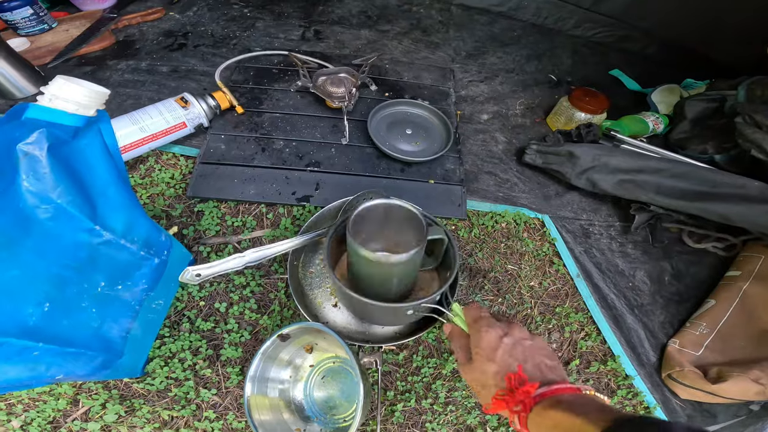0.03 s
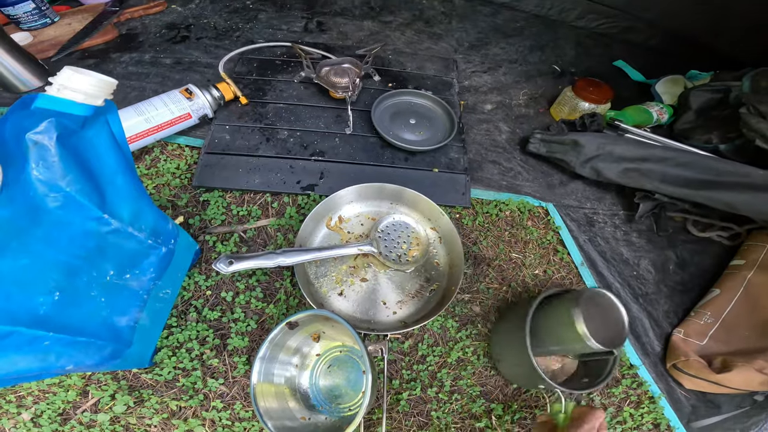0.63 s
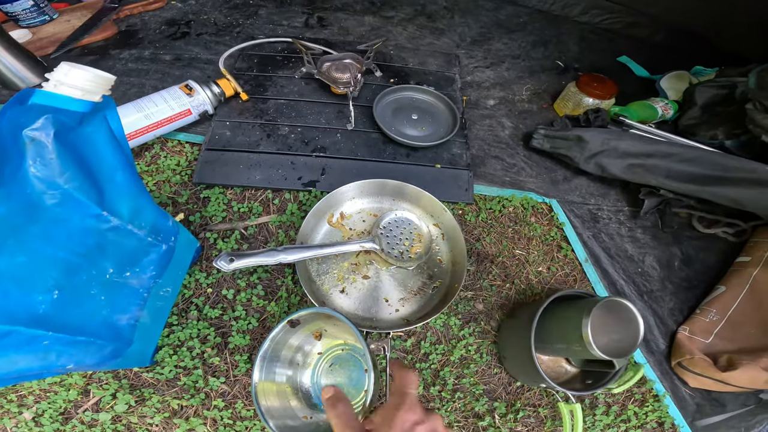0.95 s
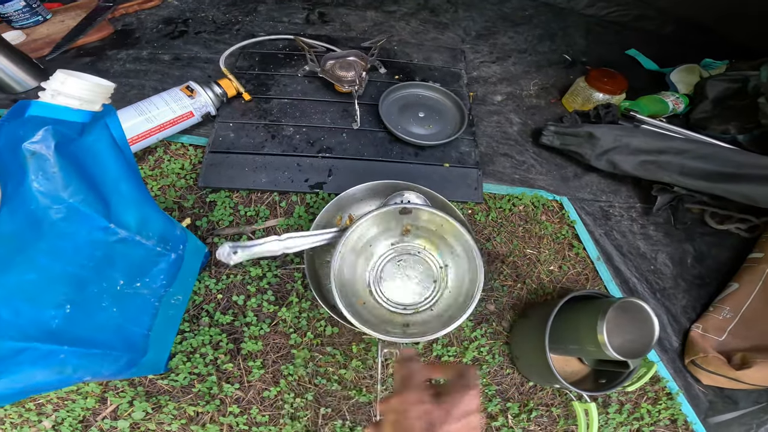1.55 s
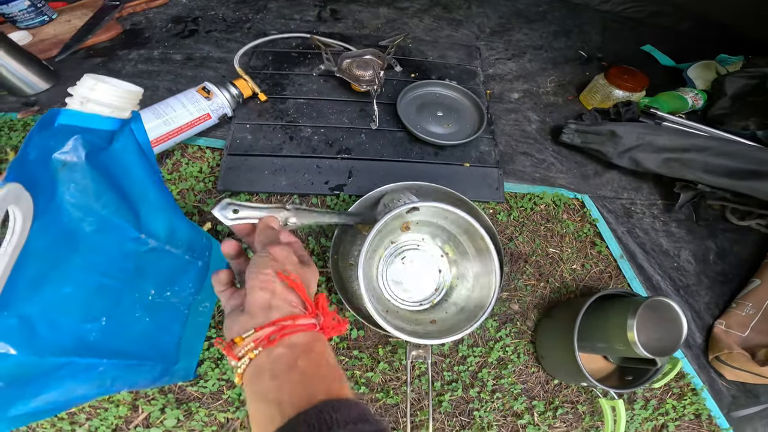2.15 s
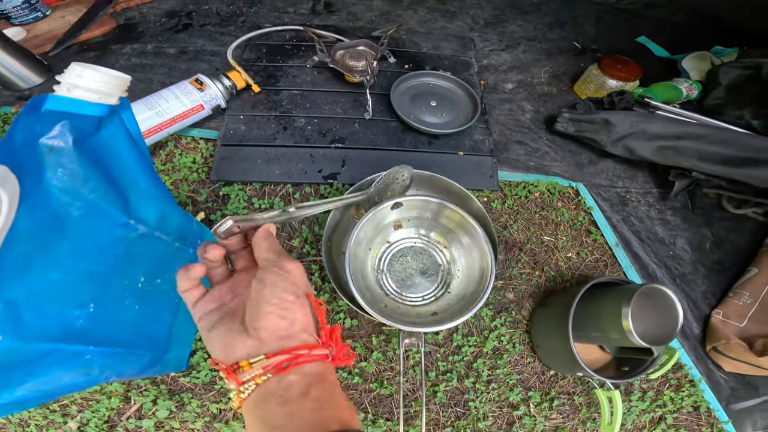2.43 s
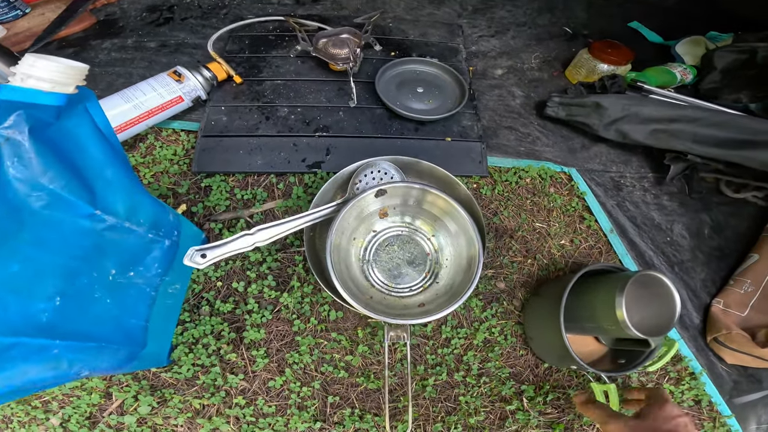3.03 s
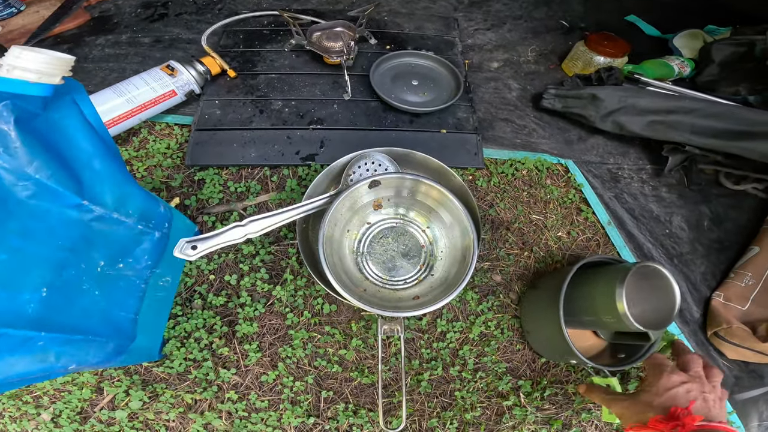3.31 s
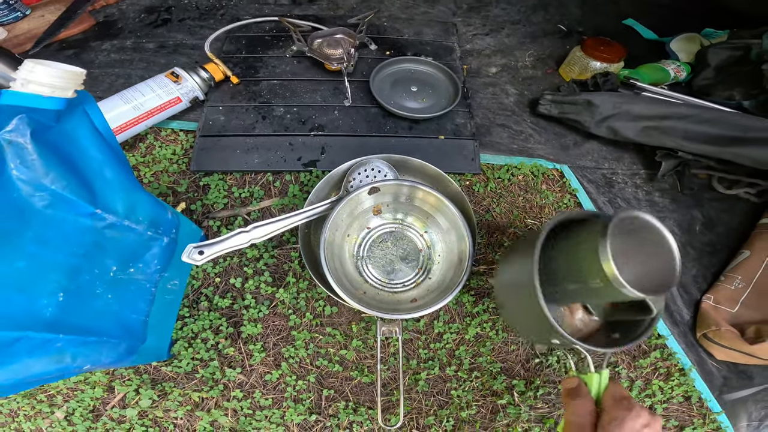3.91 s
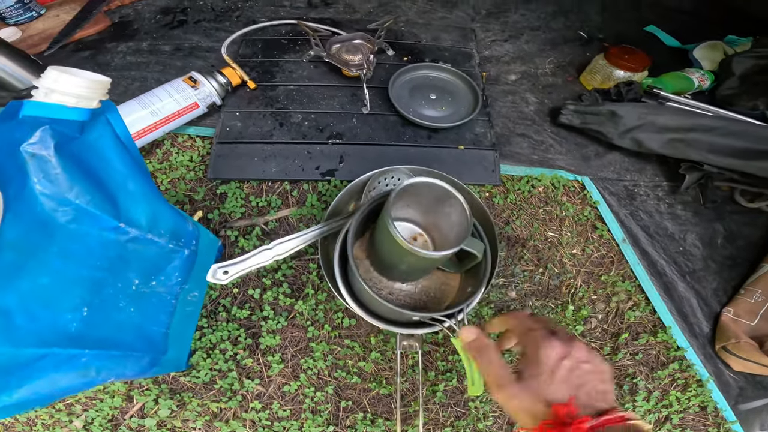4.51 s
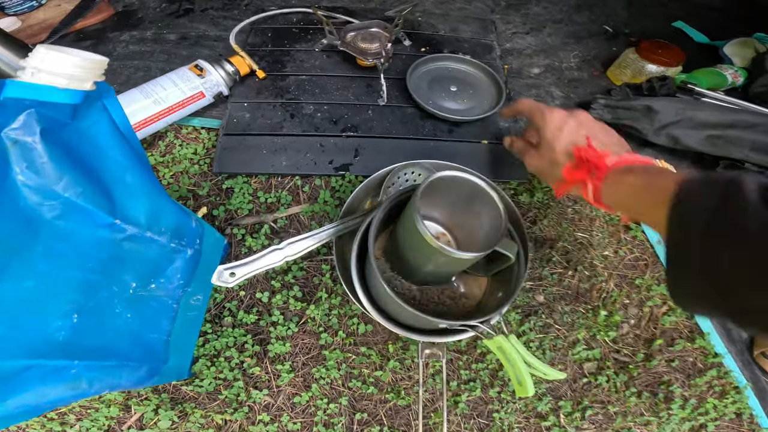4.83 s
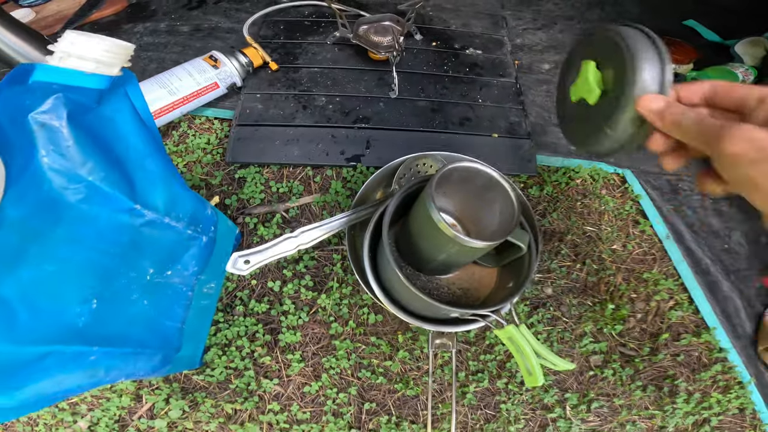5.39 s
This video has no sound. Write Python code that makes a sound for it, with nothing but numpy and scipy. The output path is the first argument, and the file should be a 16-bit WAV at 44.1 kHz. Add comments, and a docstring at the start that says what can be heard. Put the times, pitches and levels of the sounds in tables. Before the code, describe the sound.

Close metal cookware clatters, grinds and squeaks while being nested together outdoors, with one loud ringing clang from a bowl.

```python
"""In a quiet open shelter, steel camping cookware is stacked on the grass close by.
A pot with a mug in it scrapes off a pan and is set down; a bowl is picked up ringing, dropped in the
pan and slid home. A strainer is dragged round the pan, the pot is dropped into the bowl, and a lid is
picked off a table. Impacts excite the modes of the steel, which clatter and ring as they decay;
stick-slip friction makes it grind, squeak and sing. Soft outdoor air lies underneath."""
import sys
import numpy as np
from scipy import signal
from scipy.fft import rfft, irfft
from scipy.io import wavfile
from scipy.ndimage import uniform_filter1d

SR = 44100
rng = np.random.default_rng(int(sys.argv[2]) if len(sys.argv) > 2 else 0)


def dump_mix(stems):
    """Bounce the given channels to the path in sys.argv[1] as a 16-bit WAV at rate SR."""
    frames = np.atleast_2d(stems).T  # one column per channel
    limited = np.clip(frames, -1, 1)  # hard clip at full scale
    pcm = np.round(limited * 32767).astype(np.int16)
    wavfile.write(sys.argv[1], SR, pcm)


N = 249606
TIME = np.arange(N) / SR


def gain_of(db):
    """Decibels to amplitude."""
    return 10 ** (np.asarray(db) / 20)


def unit_rms(x):
    """Scales a signal to an rms of one."""
    return x / np.sqrt(np.mean(x ** 2) + 1e-20)


def spectrum_at(points, hz):
    """Amplitude of a (Hz, dB) spectrum, interpolated over log frequency."""
    point_hz, db = np.transpose(points)
    return gain_of(np.interp(np.log(hz + 1), np.log(point_hz + 1), db))


def add(mix, start_s, sound):
    """Superposition: sums a sound into the mix."""
    part = mix[max(round(start_s * SR), 0):][:len(sound)]
    part += sound[:len(part)]


def band(x, lo_hz, hi_hz, order=3):
    """Causal Butterworth band-pass."""
    return signal.sosfilt(signal.butter(order, [lo_hz, hi_hz], "band", fs=SR, output="sos"), x)


def held(start, stop, attack_s, t60):
    """Envelope of a driven vibration: a linear rise, a hold, then free decay."""
    return np.clip((TIME - start) / attack_s, 0, 1) * gain_of(-60 * np.maximum(TIME - stop, 0) / t60)


def background(air_db=-49.5, air_width=0.28, buffet_width=0.42):
    """Partly coherent noise at two microphone ports: outdoor air, and low buffets as an arm moves."""
    # Spectrum of the air. Each row: frequency in Hz, level in dB.
    air_colour = [(12, -22), (20, -1.5), (49, -12), (87, -6), (124, -11), (199, -11.5), (286, -15),
                  (398, -17), (865, -25), (1640, -22), (2550, -30), (8200, -40), (10500, -56.5),
                  (15000, -66)]
    # The level of the background, which dips briefly from 1.45 s. Each row: time in seconds, gain in dB.
    air_swell = [(0, 2), (1.45, 1), (1.75, -6), (2.5, -2), (4.2, 1), (5.66, 2)]
    # Buffets. Each row: time of the peak in seconds, level in dB, rise and fall constant in seconds.
    buffets = [(4.448, -31.5, 0.031), (4.92, -41, 0.022), (5.191, -26.5, 0.019), (5.37, -35, 0.36)]
    hz = np.fft.rfftfreq(N, 1 / SR)
    noise = irfft(rfft(rng.standard_normal((2, N))) * spectrum_at(air_colour, hz), N)
    mid, side = (unit_rms(x) for x in noise)
    swell = gain_of(air_db + np.interp(TIME, *np.transpose(air_swell)))
    air = swell * np.array([mid + air_width * side, mid - air_width * side])
    mid, side = unit_rms(band(rng.standard_normal((2, N)), lo_hz=10, hi_hz=42, order=2))
    pressure = sum(gain_of(db) * np.exp(-abs(TIME - s) / fade_s) for s, db, fade_s in buffets)
    return air + pressure * np.array([mid + buffet_width * side, mid - buffet_width * side])


def slide(strokes, colour, slips_per_s, uneven_db, patchy_db, pan_db, t60, release_t60, attack_s=0.015):
    """Stick-slip friction: random slips ring the steel, the moving contact favouring changing modes."""
    # Resonances of the rubbed pan. Each row: frequency in Hz, width in Hz, lift in dB.
    pan_modes = [(478, 36, 8), (873, 11, 6.5), (1377, 75, 9.5), (1195, 15, 16), (1786, 81, 5.5),
                 (2930, 69, 10.5), (3000, 31, -26), (3380, 35, 7), (4160, 68, 3.5), (5970, 36, -21),
                 (7400, 22, 15), (7680, 14.6, 15.5), (7750, 10, 19), (8280, 8, 13), (8220, 7, 14)]
    slips = rng.random(N) < slips_per_s / SR
    slips = slips * gain_of(uneven_db * np.minimum(rng.exponential(1, N), 3)) * rng.choice([-1, 1], N)
    t, hz = np.arange(SR // 6) / SR, np.fft.rfftfreq(N, 1 / SR)
    steel = signal.oaconvolve(slips, rng.standard_normal(len(t)) * gain_of(-60 * t / t60))[:N]
    pan_power = 1 + sum(gain_of(db + pan_db) ** 2 / (1 + (2 * (hz - mode_hz) / width) ** 2)
                        for mode_hz, width, db in pan_modes)
    steel = irfft(rfft(steel) * spectrum_at(colour, hz) * np.sqrt(pan_power), N)
    frames = signal.stft(steel, nperseg=512)[2]
    patches = uniform_filter1d(rng.standard_normal(frames.shape), size=5, axis=0)  # over frequency
    patches = unit_rms(uniform_filter1d(patches, size=8, axis=1))  # over time
    rub = signal.istft(frames * gain_of(patchy_db * patches), nperseg=512)[1][:N]
    grind, screech = band(rub, 150, 6300, order=6), band(rub, 6700, 17000, order=6)
    forces = np.max([np.outer(gain_of(levels_db), held(start, stop, attack_s, release_t60))
                     for start, stop, *levels_db in strokes], axis=0)
    # Each band is divided by its running rms, so the hand's force sets its level.
    return sum(force * part / np.sqrt(uniform_filter1d(part ** 2, size=2200) + 1e-12)
               for force, part in zip(forces, (grind, screech)))


def rebounds(blows, middle_db, gap_s, loss_db, duller_db, graze_db, graze_s=0.005):
    """Inelastic impact: a graze, a strike and a softer return; hard contacts trade bass for treble."""
    touches = [(0, 0, 0), (-graze_s, graze_db, 0), (gap_s, -loss_db, -duller_db)]
    contacts = [(s + delay, db + change, hardness + harder, t60)
                for delay, change, harder in touches for s, db, hardness, t60, *_ in blows]
    return [(s, db - hardness, db + middle_db, db + hardness, t60) for s, db, hardness, t60 in contacts]


def clatter(contacts, colour, spacing_hz, crack, crack_t60, rise_s, size=16384):
    """Impulse response of dense, heavily damped modes: a hard crack, then a quick metallic decay."""
    # The low, middle and treble ranges of a blow. Each row: lower edge in Hz, upper edge in Hz.
    ranges = [(60, 2200), (2200, 6500), (6500, 17000)]
    hz, t, out = np.fft.rfftfreq(size, 1 / SR), np.arange(size) / SR, np.zeros(N)
    for s, *levels_db, t60 in contacts:
        modes = (rng.random(len(hz)) < hz[1] / spacing_hz) + 0.056  # each contact wakes another set
        spectrum = modes * spectrum_at(colour, hz) * np.exp(2j * np.pi * rng.random(len(hz)))
        decay = gain_of(-60 * t / t60) + crack * gain_of(-60 * t / crack_t60)
        envelope = decay * (1 - np.exp(-t / rise_s))
        for db, (lo, hi) in zip(levels_db, ranges):
            part = irfft(spectrum * (hz >= lo) * (hz < hi)) * envelope
            add(out, s, gain_of(db) * part / part[:SR // 150].std())  # level set by the first 7 ms
    return out


def ring(blows, modes, spread_db, rise_s=0.0037):
    """Free vibration: distinct modes decay exponentially, in a balance that varies from blow to blow."""
    hz, t60, *spot_levels = np.transpose(modes)
    t, out = np.arange(SR) / SR, np.zeros(N)
    waves = gain_of(-60 * t / t60[:, None]) * np.exp(2j * np.pi * hz[:, None] * t)
    waves *= (1 - np.exp(-t / rise_s)) * np.minimum(1, 10 * (1 - t))
    for s, _, _, _, ring_db, *spot in blows:
        mode_db = np.array([np.interp(sum(spot), np.arange(len(row)), row)
                            for row in np.transpose(spot_levels)])
        amplitudes = gain_of(ring_db + mode_db + spread_db * rng.standard_normal(len(hz)))
        phases = np.exp(2j * np.pi * rng.random(len(hz)))
        add(out, s, ((amplitudes * phases) @ waves).real)
    return out


def pot():
    """Impact and friction excite the pot; the point struck decides how strongly each mode responds."""
    # Blows. Each row: start in seconds, strength in dB, hardness in dB, clatter t60 in seconds,
    # ring in dB, spot struck (0 the mug inside, 1 the handle, 2 the base).
    blows = [(.018, -39.5, -1.5, 0.076, -37.5, .9), (.067, -27.5, -1.5, 0.095, -25.5, 1.4),
             (.271, -32, -7, 0.039, -36, .45), (.306, -39, 8.5, .047, -41.5, 1),
             (.321, -38, -4, 0.088, -41, 0), (.426, -50, -9, .057, -46, .2),
             (.608, -31.5, -4.5, 0.17, -27, 0), (.673, -38, -7, 0.09, -39, 0),
             (.772, -43.5, -3.5, 0.31, -45, 1), (.7965, -25, -1, 0.12, -33, 1),
             (.980, -53, -15, 0.2, -58, 0), (1.015, -49, -1, .05, -63, 1), (1.028, -46, -6, 0.074, -44, .4),
             (3.439, -39.5, -2.5, 0.067, -46, 1), (3.535, -31.5, -3, 0.18, -34.5, 1),
             (3.545, -25, 1.5, 0.1, -39, 0.34), (3.654, -54.5, -8.5, .15, -52, .4),
             (3.690, -43, 1.5, 0.11, -48, 1), (3.7095, -31, -4, 0.11, -41, .1),
             (3.893, -55, -14, 0.067, -63, .7), (4.458, -30.5, -3.5, .1, -46, 1),
             (4.4885, -32.5, -14, 0.025, -32, 1.84), (4.539, -37, 4, 0.093, -32, 2),
             (4.606, -31, -0.5, 0.1, -33.5, 1.86), (4.703, -45.5, -3, 0.028, -55, 1)]
    # Modes. Each row: frequency in Hz, t60 in seconds, level in dB when struck at mug, handle and base.
    modes = [(602, 0.3, -5, -14, -13.5), (850, .2, -10, -9, -6), (1215, 0.51, -19, -13.5, -12),
             (1310, 0.32, -29, -3, -13), (1430, .13, 5.5, 7, -7), (1487, 0.21, 4.5, 1, -14),
             (1780, 0.16, -23, -3, -12), (1764, 0.4, -25, -6, -10), (2470, 0.32, -13, -14, -30),
             (2792, 0.43, -19, -38, 2), (2850, 0.53, -24, -20, -11), (3040, 0.43, -40, -1.5, -16),
             (3080, 0.45, -16, -15, -28), (3246, 0.033, 20, -22, -24), (3500, 0.089, -18, 0, -19),
             (3600, 0.053, 9, -14, -21), (3820, 0.19, -23, -3, -10), (3820, 0.29, -23, -22, -32),
             (4110, 0.54, -21, -14, -40), (4560, 0.51, -27, -16, -40), (4950, 0.13, -16, -4, -32),
             (5600, .09, -16, 1, -20), (6800, .15, -28, -16, -36), (7460, .17, -14, -17, -24),
             (8600, .12, -25, -12, -25)]
    # Spectra of the clatter and of the rubbing. Each row: frequency in Hz, level in dB.
    colour = [(120, -11), (480, -14.5), (590, -8), (760, -12), (920, 3.5), (1170, -6.5), (1470, -1.5),
              (2100, -8.5), (3230, -1.5), (4350, -9), (5600, -1), (8400, -10.5), (10000, -25), (15500, -38)]
    rub_colour = [(180, -18), (300, -14), (365, -16), (459, -20.5), (703, -20), (855, 4), (1020, -10),
                  (1210, -14), (1790, -7.5), (2440, -13.5), (3670, -10), (6100, -5), (7540, -20.5),
                  (15000, -46.5)]
    # Strokes off the pan, then into the bowl.
    # Each row: start and stop in seconds, grind in dB, screech in dB.
    scraping = [(0, 0.203, -39, -42.5), (0.181, 0.256, -33, -34), (0.254, 0.317, -30, -30.5),
                (0.356, 0.596, -35, -36)]
    settling = [(4.457, 4.492, -28, -33), (4.535, 4.57, -32, -32.5), (4.59, 4.625, -45, -41.5)]
    contacts = rebounds(blows, middle_db=2, gap_s=0.014, loss_db=12, duller_db=6, graze_db=-16.5)
    out = clatter(contacts, colour, spacing_hz=49.9, crack=1, crack_t60=0.051, rise_s=0.0001)
    out += ring(blows, modes, spread_db=3)
    out += slide(scraping, rub_colour, slips_per_s=1600, uneven_db=3.5, patchy_db=4.5, pan_db=-3.5,
                 t60=0.043, release_t60=0.16)
    return out + slide(settling, rub_colour, slips_per_s=1100, uneven_db=2.5, patchy_db=5, pan_db=0.5,
                       t60=0.032, release_t60=0.12)


def squeaks(waver=0.013):
    """Mode lock-in: a sliding edge drives a single mode into a brief, wavering tone."""
    # Squeaks and groans. Each row: centre in seconds, pitch in Hz, peak in dB, half width in seconds.
    tones = [(0.26, 7750, -20.5, .0058), (1.495, 463, -28, 0.04), (0.348, 4300, -32, 0.0086),
             (.387, 3840, -30, 0.0096), (2.68, 860, -28, 0.023), (2.997, 4000, -27.5, 0.014),
             (4.59, 5560, -26, .0037), (4.624, 4900, -30, 0.0045), (2.623, 5220, -29, 0.0089)]
    t, out = np.arange(SR // 5) / SR, np.zeros(N)
    for s, hz, db, half_s in tones:
        pitch = hz * (1 + waver * unit_rms(uniform_filter1d(rng.standard_normal(len(t)), size=150)))
        swell = np.exp(-((t - t.mean()) / half_s) ** 2)
        add(out, s - t.mean(), gain_of(db) * swell * np.sin(2 * np.pi * np.cumsum(pitch) / SR))
    return out


def clunks(thud_t60=0.085, bounce_s=0.011):
    """Plate flexure: a thin bottom lands, bends for a few cycles, bounces and thuds on soft ground; one low row
    is a push as an arm swings."""
    # Landings, and at 4.443 s a low push as an arm swings. Each row: start in seconds, frequency in Hz, peak in
    # dB, swell in seconds, thud in dB, loss per bounce in dB.
    landings = [(.799, 928, -20, 0.0046, -50, 3.5), (1.4544, 1003, -1, 0.001, -24.5, 10),
                (1.5051, 940, -8, 0.0028, -28, 4.5), (1.642, 1030, -12.5, 0.0026, -63, 15),
                (1.723, 1074, -8.5, 0.002, -36.5, 11), (4.443, 84.5, -27, 0.011, -35, 20),
                (4.456, 653, -8, 0.0038, -26, 9), (4.4893, 877, -12, 0.003, -25, 24),
                (5.246, 635, -25, 0.0041, -57, 23)]
    t, out = np.arange(SR // 5) / SR, np.zeros(N)
    for s, hz, db, swell_s, thud_db, loss_db in landings:
        flex = (t / swell_s * np.exp(1 - t / swell_s)) ** 2 * np.sin(2 * np.pi * hz * t)
        thud = unit_rms(band(rng.standard_normal(len(t)), lo_hz=90, hi_hz=480, order=2))
        add(out, s, gain_of(thud_db - 60 * t / thud_t60) * thud)
        for bounce in range(3):
            add(out, s + bounce * bounce_s, gain_of(db - bounce * loss_db) * flex)
    return out


def bowl():
    """Lightly damped modes let the struck bowl ring on; friction drives it as it slides into the pan."""
    # Blows. Each row: start in seconds, strength and hardness in dB, clatter t60 in seconds, ring in dB.
    blows = [(1.142, -28, -7.5, 0.18, -24.5), (1.454, -38, 3, 0.065, -28.5), (1.587, -30, 0, .13, -32.5),
             (1.634, -33.5, -2.5, .12, -47), (1.723, -38, -3.5, 0.27, -44), (1.897, -60, -2, .14, -71)]
    # Modes. Each row: frequency in Hz, t60 in seconds, level in dB.
    modes = [(457, .9, -14.5), (729, 3, -21.5), (930, 1.2, -18.5), (1210, 0.52, -9.5), (1353, 0.89, -2.5),
             (1376, 0.36, -1.5), (1743, 0.26, 4), (1810, 0.65, -13), (1954, 0.56, -9), (1987, 0.65, -8.5),
             (2420, 0.34, -8), (2510, 0.53, -19), (3126, 0.18, -9), (3170, 0.25, -9.5), (3200, 0.12, -28),
             (3500, 0.49, -46), (3660, 0.43, -20), (4250, 0.18, -12), (4010, 0.25, -5), (4930, .3, -17),
             (5560, 0.1, -16), (7784, .2, -31)]
    # Spectra of the clatter and of the rubbing. Each row: frequency in Hz, level in dB.
    colour = [(120, -15), (600, -23.5), (950, -7), (1200, 4.5), (1500, -10), (1800, -9.5), (2200, -12.5),
              (3900, -10.5), (4800, -16), (5800, -18.5), (8000, -16), (10000, -25.5), (15500, -45.5)]
    rub_colour = [(150, -35), (420, -20), (560, -43), (740, -4), (900, -2), (1100, -1.5), (1280, -19),
                  (1550, -24), (1800, -10.5), (2200, -24), (2900, -19), (4600, -27.5), (6300, -17),
                  (7800, -21), (10000, -34), (15500, -50)]
    # Strokes. Each row: start and stop in seconds, grind in dB, screech in dB.
    strokes = [(1.473, 1.595, -27, -37), (1.625, 1.673, -25.5, -33), (1.721, 1.765, -32, -35.5)]
    contacts = rebounds(blows, middle_db=2, gap_s=0.014, loss_db=12, duller_db=0, graze_db=-16)
    out = clatter(contacts, colour, spacing_hz=57.3, crack=0.64, crack_t60=0.02, rise_s=0.0001)
    out += bowl_singing() + ring(blows, modes, spread_db=1)
    return out + slide(strokes, rub_colour, slips_per_s=700, uneven_db=7.5, patchy_db=0.5, pan_db=-1,
                       t60=0.21, release_t60=0.15)


def bowl_singing(start_s=1.453, stop_s=1.74, level_db=-21, sag_db_per_s=22.5, waver=0.15):
    """Self-sustained oscillation: an unsteady grip keeps a few modes going, weaker as the bowl slows."""
    # Modes driven by rubbing on the pan. Each row: frequency in Hz, relative level in dB.
    modes = [(463, -21.5), (879, -9), (1179.5, 2), (1377.5, -3.5), (2568, -19), (3129, -15.5), (3246, -33),
             (4188, -24)]
    out = np.zeros(N)
    for hz, db in modes:
        grip = 1 + waver * unit_rms(band(rng.standard_normal(N), lo_hz=3.8, hi_hz=22, order=2))
        out += gain_of(db) * grip * np.sin(2 * np.pi * (hz * TIME + rng.random()))
    sag_db = sag_db_per_s * np.maximum(TIME - start_s, 0)
    return out * gain_of(level_db - sag_db) * held(start_s, stop_s, attack_s=0.018, t60=0.39)


def strainer():
    """Sliding friction and knocks excite the damped modes of a strainer dragged round the pan."""
    # Blows. Each row: start in seconds, strength and hardness in dB, clatter t60 in seconds, ring in dB.
    blows = [(2.196, -40, -2.5, 0.13, -45), (2.259, -34.5, 4, 0.049, -43), (2.458, -40, -7, .08, -43),
             (2.510, -42, 7, 0.31, -40.5), (2.7615, -20, -1, 0.022, -50),
             (2.863, -24.5, -6.5, 0.066, -35.5), (2.890, -33, -4, 0.046, -47),
             (2.922, -38.5, -7, .067, -41), (2.965, -27.5, -1.5, 0.076, -41),
             (2.992, -30.5, 1, .054, -40.5), (3.0445, -28, -0.5, 0.06, -40)]
    # Modes of the strainer on the pan. Each row: frequency in Hz, t60 in seconds, level in dB.
    modes = [(457, 0.4, -34), (817, 0.044, 7), (1193, 0.096, 2), (1786, 0.093, 12.5), (2970, 0.28, -3),
             (3440, 0.17, -4), (3680, 0.21, -1), (4200, 0.15, -12), (6700, 0.13, 4.5), (7700, .13, -9)]
    # Spectra of the clatter and of the rubbing. Each row: frequency in Hz, level in dB.
    colour = [(120, -19), (620, -35), (870, 9), (1400, -5), (1800, 6.5), (2350, -16), (2900, -0.5),
              (5500, -9.5), (6500, -5.5), (7800, 0), (10000, -19), (15500, -44)]
    rub_colour = [(180, -36), (300, -24), (669, -18.5), (855, 1.5), (1620, -19), (1820, -10), (2320, -20.5),
                  (2820, -13.5), (3220, -15.5), (4050, -13), (4390, -14.5), (6400, -9), (7670, -4),
                  (9960, -19.5), (15000, -38.5)]
    # Strokes. Each row: start and stop in seconds, grind in dB, screech in dB.
    strokes = [(2.155, 2.196, -51, -48.5), (2.184, 2.256, -38, -39.5), (2.25, 2.368, -32, -35.5),
               (2.378, 2.556, -39, -40.5), (2.59, 2.61, -38.5, -31), (2.61, 2.635, -31.5, -24.5),
               (2.655, 2.718, -32.5, -38), (2.756, 2.84, -28, -22.5), (2.882, 2.93, -30, -28),
               (2.965, 3.06, -29, -28.5)]
    contacts = rebounds(blows, middle_db=-1, gap_s=0.033, loss_db=15.5, duller_db=5, graze_db=-12)
    out = clatter(contacts, colour, spacing_hz=37.1, crack=0.78, crack_t60=0.019, rise_s=0.00052)
    out += ring(blows, modes, spread_db=0.5)
    return out + slide(strokes, rub_colour, slips_per_s=1500, uneven_db=2.5, patchy_db=3, pan_db=1,
                       t60=0.12, release_t60=0.14)


def lid():
    """Light impacts and a short scrape set the lid in damped vibration as it leaves the table."""
    # Blows. Each row: start in seconds, strength and hardness in dB, clatter t60 in seconds, ring in dB.
    blows = [(5.113, -60, 4.5, .1, -68), (5.145, -55.5, -14.5, 0.13, -66),
             (5.1805, -31, -1.5, 0.073, -40.5), (5.227, -37, -1.5, .07, -36.5),
             (5.2475, -32, -7, .069, -36.5)]
    # Modes. Each row: frequency in Hz, t60 in seconds, level in dB.
    modes = [(640, 0.067, 11.5), (1110, 0.092, 3), (1300, 0.23, -8.5), (1435, 0.55, -15), (2510, .1, 1),
             (2710, 0.2, -8), (3126, 0.1, -3), (4150, 0.091, -12), (5340, 0.11, -4)]
    # Spectrum of both clatter and rubbing. Each row: frequency in Hz, level in dB.
    colour = [(120, -3), (420, -3.5), (630, -1), (850, 0), (1200, -1.5), (2200, -6), (3100, 2), (4500, -10),
              (7200, -6.5), (10000, -25), (15500, -42)]
    # One stroke. Its row: start and stop in seconds, grind in dB, screech in dB.
    strokes = [(5.195, 5.245, -32, -45)]
    contacts = rebounds(blows, middle_db=1, gap_s=0.017, loss_db=16.5, duller_db=3.5, graze_db=-25)
    out = clatter(contacts, colour, spacing_hz=35.1, crack=0.96, crack_t60=0.022, rise_s=0.00059)
    out += ring(blows, modes, spread_db=4)
    return out + slide(strokes, colour, slips_per_s=560, uneven_db=1.5, patchy_db=2, pan_db=-30,
                       t60=0.07, release_t60=0.077)


def shelter(x, scatter_db=-10, echoes_per_s=2500, t60=0.016, treble_tilt_db=1.05):
    """Scattering off nearby gear, a phase difference and a brighter left port set the channels apart."""
    # Phase lead of the left microphone port over the right. Each row: frequency in Hz, lead in radians.
    port_lead = [(250, -0.019), (1000, -0.21), (1720, -1.01), (2760, -0.48), (7000, 0.65), (12000, 1)]
    t, hz = np.arange(SR // 10) / SR, np.fft.rfftfreq(N, 1 / SR)
    echoes = rng.choice([-1, 1], len(t)) * (rng.random(len(t)) < echoes_per_s / SR)
    echoes = echoes * gain_of(-60 * t / t60)
    echoes = band(echoes / np.linalg.norm(echoes), lo_hz=850, hi_hz=22000)
    side = gain_of(scatter_db) * signal.oaconvolve(x, echoes)[:N]
    lead_hz, lead = np.transpose(port_lead)
    phase = np.interp(np.log(hz + 1), np.log(lead_hz + 1), lead)
    left = np.exp(0.5j * phase) * gain_of(treble_tilt_db * np.minimum(hz / 8000, 1) ** 2)
    return irfft(rfft(x) * np.array([left, 1 / left]), N) + np.array([side, -side])


def scene():
    """Superposition of all the cookware, heard in the shelter over the outdoor air."""
    cookware = pot() + bowl() + strainer() + lid() + clunks() + squeaks()
    return shelter(cookware) + background()


def record(dry, cutoff_hz=15700):
    """Band limiting: a linear-phase low-pass removes the highest treble."""
    low_pass = signal.firwin(511, cutoff_hz, window=("kaiser", 9), fs=SR)
    return signal.oaconvolve(dry, low_pass[None], "same", axes=1)


dry = scene()
out = record(dry)
dump_mix(out)
```